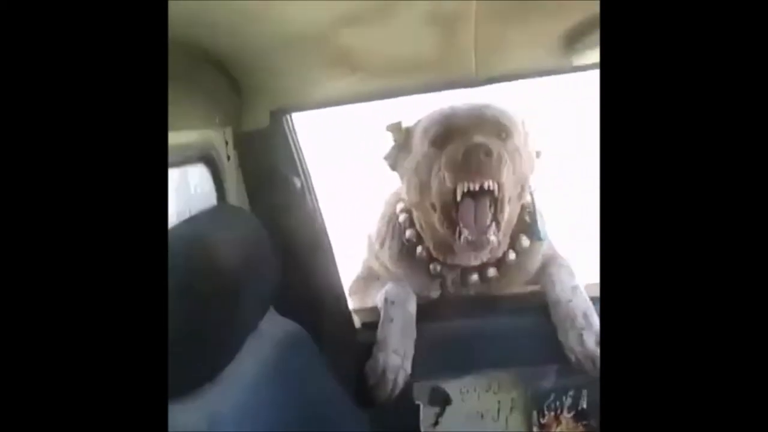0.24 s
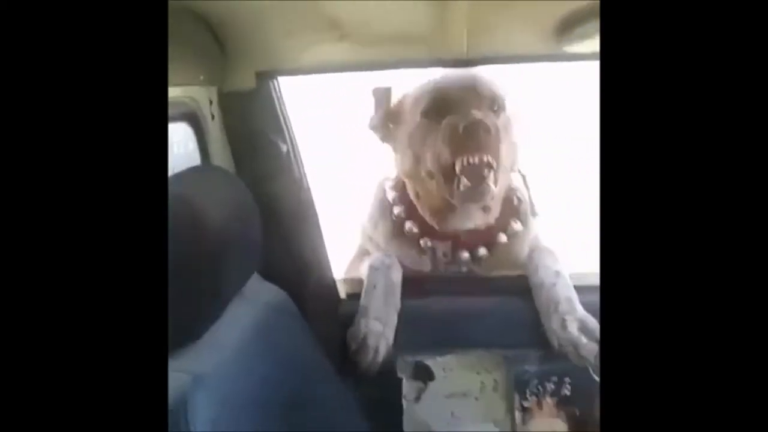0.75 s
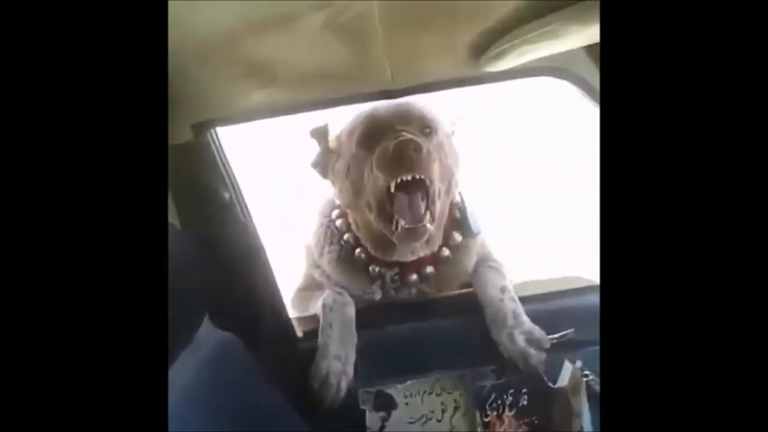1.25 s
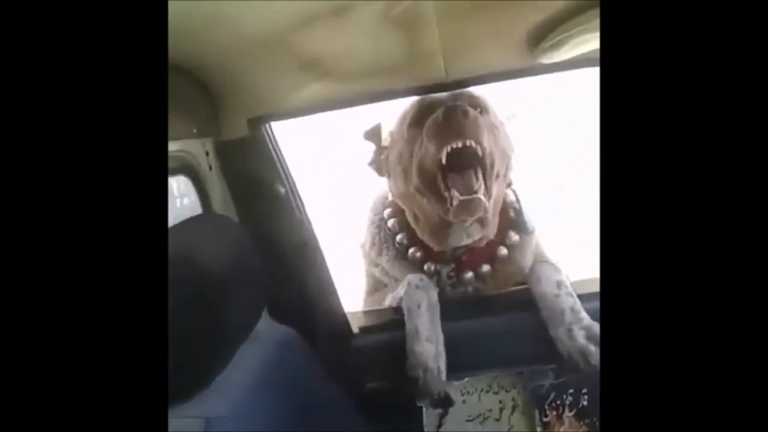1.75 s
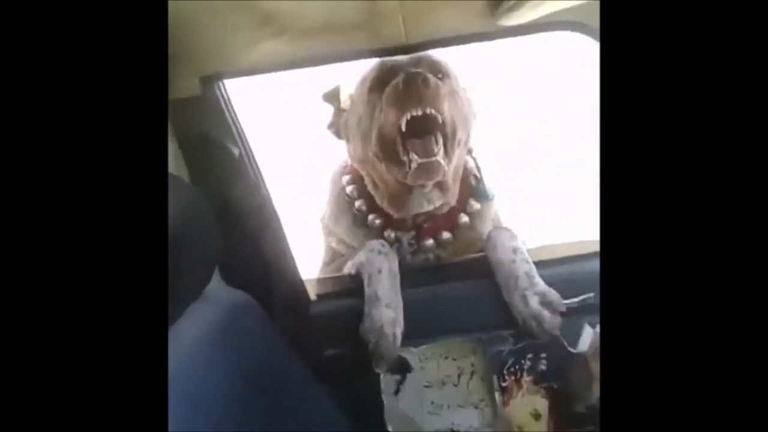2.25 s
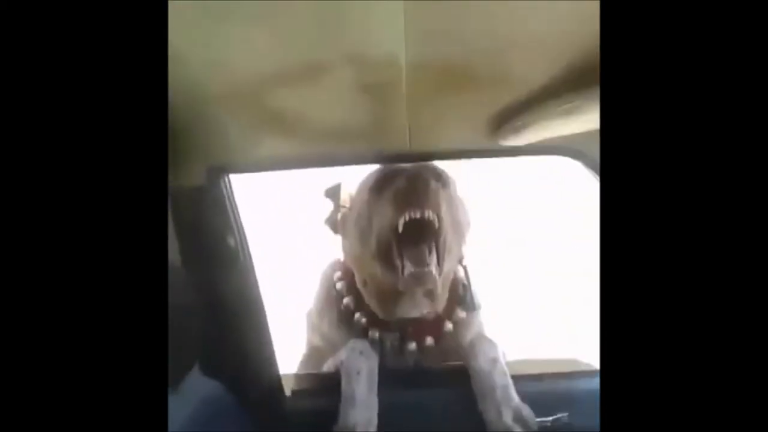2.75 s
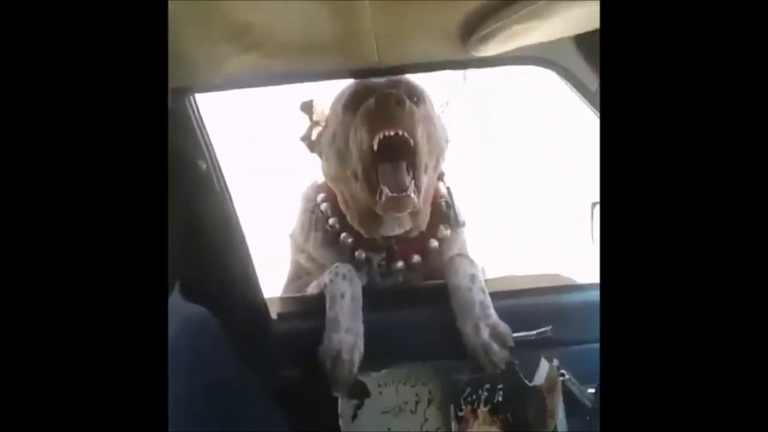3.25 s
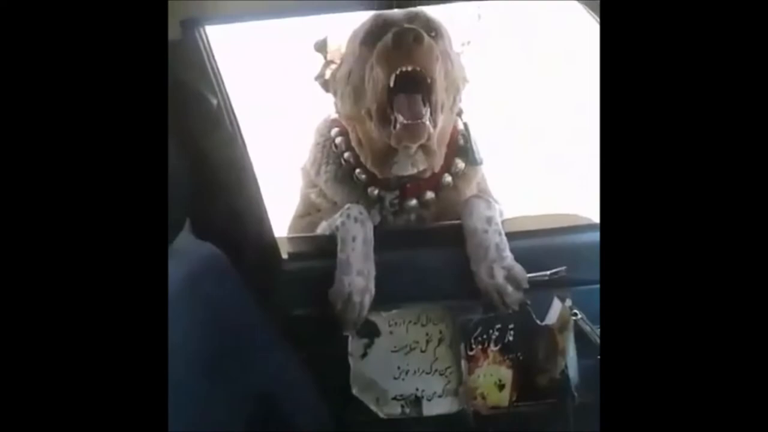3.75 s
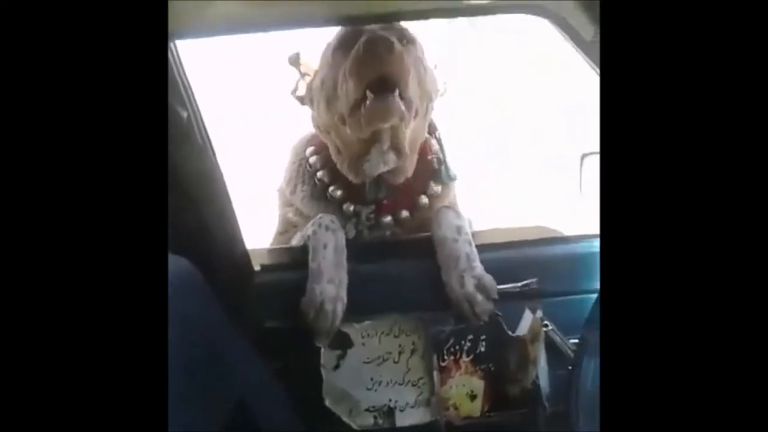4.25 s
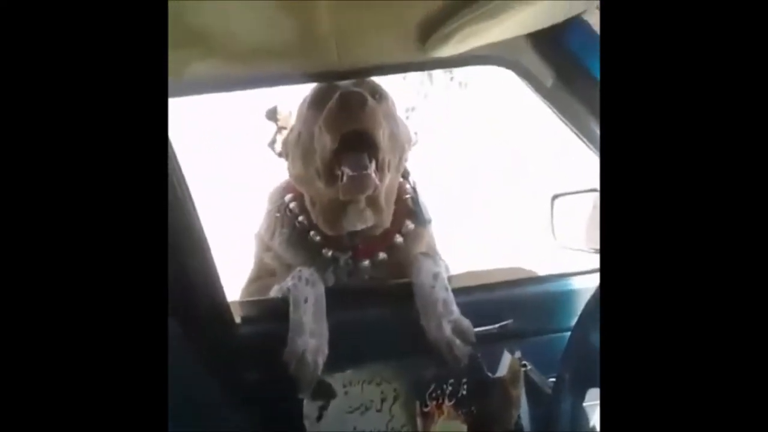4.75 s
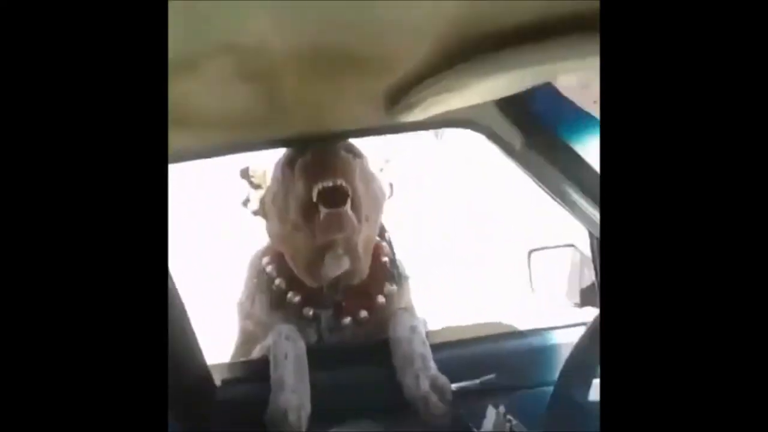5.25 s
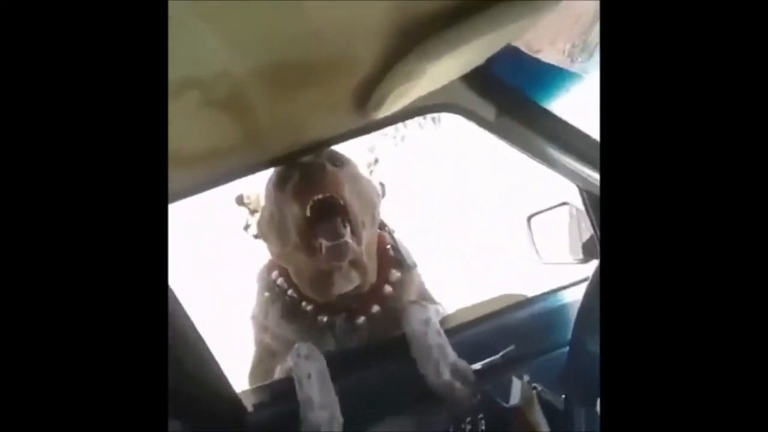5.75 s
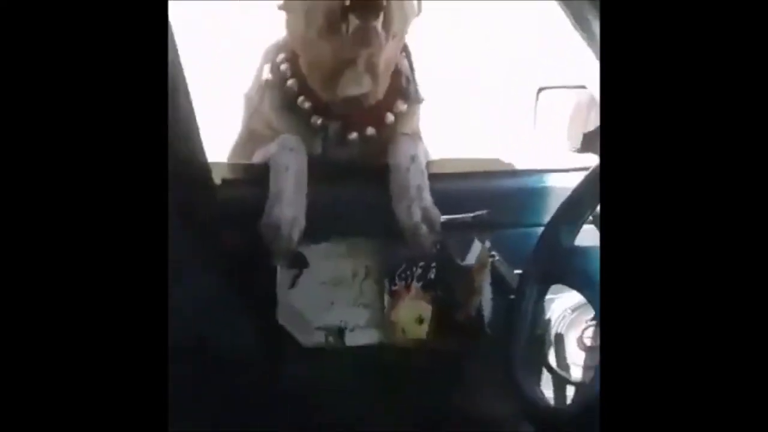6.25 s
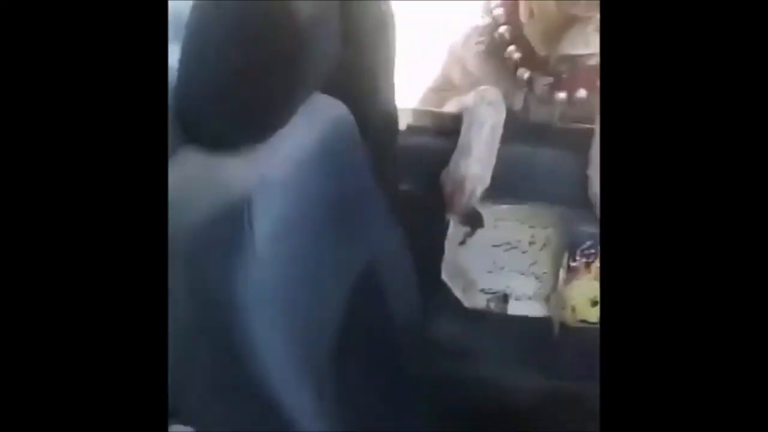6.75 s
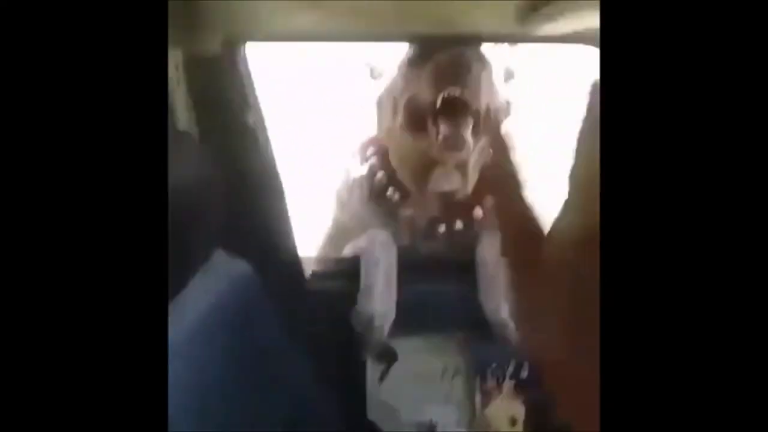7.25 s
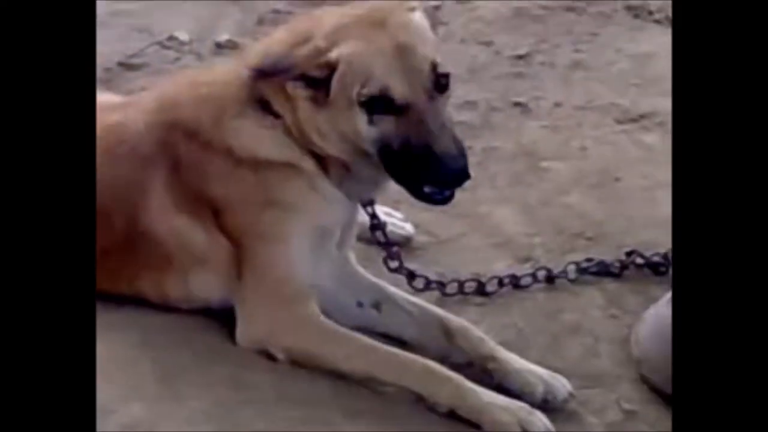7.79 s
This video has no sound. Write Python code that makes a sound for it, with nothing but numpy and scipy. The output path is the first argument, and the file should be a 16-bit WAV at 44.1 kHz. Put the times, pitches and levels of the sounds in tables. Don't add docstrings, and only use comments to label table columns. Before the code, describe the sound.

Close, throaty dog barks between raspy snoring inhalations and fluttering growls; a final loud snarl cuts abruptly to a quiet low moan and chain ticks.

```python
import sys
import numpy as np
from scipy import signal
from scipy.fft import rfft, irfft
from scipy.io import wavfile
from scipy.ndimage import uniform_filter1d

SR = 44100
rng = np.random.default_rng(int(sys.argv[2]) if len(sys.argv) > 2 else 0)


def store_pcm(level_fs):
    pcm = np.round(np.clip(level_fs, -1, 1) * 32767).astype(np.int16)
    wavfile.write(sys.argv[1], SR, np.atleast_2d(pcm).T)


def linear_from_db(decibels):
    return 10 ** (np.asarray(decibels, float) / 20)


N = 353682

# start_s, end_s, level_db, hiss_db (relative), hiss_sag_db_per_s
SNORES = [
    (-.1, 0.602, -33.5, 6.5, 12.5),
    (0.962, 1.5, -36.5, 7.5, 23.5),
    (3.18, 4.043, -35.5, 1, 5.5),
    (4.406, 5.028, -33.5, 1, 17.5),
    (5.435, 6.04, -33, -0.5, 2.5),
]
# time_s, louder_db
HARD_FLAPS = [(0.048, 0.5), (0.224, 5), (0.273, 2.5), (0.499, -3.5), (1.097, 1.5), (1.15, 5.5),
              (1.252, 5.5), (1.413, 1.5), (3.322, 2), (3.526, 2), (3.676, 8.5), (3.775, 4.5), (3.874, 10.5),
              (4, 14), (4.533, -2.5), (4.587, 2.5), (4.713, 2.5), (4.952, 2), (5.521, -3.5), (5.625, 1.5),
              (5.75, 7.5), (5.827, 3.5), (5.975, 3.5)]
# start_s, length_s, level_db, crest_place (0-1), air_db (relative)
BARKS = [
    (0.588, 0.15, -13, 0.5, 0),
    (1.516, 0.14, -10, 0.7, -4.5),
    (2.853, 0.16, -14.5, 0.74, 1),
    (4.066, 0.14, -10, 0.5, -3),
    (5.026, .155, -14, 0.5, -0.5),
    (6.103, 0.16, -15, 0.7, 2.5),
]
# time_s, effort_db, voicing (0-1), lips_drawn_back (0-1), extra_hiss_db
GROWLS = [
    [(1.68, -36.5, 1, 0.25, -6), (1.78, -37.5, 0.37, 0.06, -0.5), (1.98, -38.5, 0, 0.4, -3),
     (2.1, -43.5, 0.52, 0.2, -4), (2.36, -46, 0.62, 0.3, 1.5), (2.52, -35, 0.9, 0.2, -3),
     (2.65, -37.5, 1, 0.07, -0.5), (2.78, -29, 0.95, 0.56, -4.5), (2.92, -24, 0.84, 0.77, 2.5)],
    [(6.28, -36, 0.9, 0, -6), (6.4, -38.5, 0.7, 0.4, -11), (6.6, -44.5, 0.64, 0.6, -4),
     (6.8, -42.5, 0.33, 0.8, -3.5), (7.0, -36, 0.03, 0.8, -3.5), (7.15, -32.5, 0, 0.76, -3.5),
     (7.3, -26, 0.15, 0.76, -5), (7.5, -24, 0.18, 0.77, -5.5), (7.62, -19.5, 0.34, 0.9, 0)],
]


def in_time(rows):
    s, *columns = np.transpose(rows)
    return [np.interp(np.arange(N) / SR, s, c) for c in columns]


def rms_one(x):
    return x / np.sqrt(np.mean(x ** 2) + 1e-20)


def cut(x, hz, kind, order=2):
    return signal.sosfilt(signal.butter(order, hz, kind, fs=SR, output="sos"), x)


def drift(rate, shape=lambda slow: slow):
    r = np.exp(-32 * np.pi * rate / SR)
    slow = signal.lfilter([1], [1, -2 * r, r * r], rng.standard_normal(N // 16 + 2002))[2000:]
    return np.interp(np.arange(N) / 16, np.arange(len(slow)), shape(rms_one(slow)))


def resonate(x, modes, widen=1.0, patchy_db=0.0):
    out = 0
    for k, (hz, width, db) in enumerate(modes):
        r = np.exp(-np.pi * width * widen / SR)
        poles = [1, -2 * r * np.cos(2 * np.pi * hz / SR), r * r]
        rung = signal.lfilter([1, 0, -1], poles, x) * (1 - r * r) / 2
        swell = drift(6.7, lambda slow: linear_from_db(db + patchy_db * slow))
        out = out + (-1) ** k * swell * rung
    return out


def evened(x, size):
    return x / np.sqrt(uniform_filter1d(x ** 2, size, axis=-1) + 1e-12)


def in_step(turns, marks):
    at = (np.array(marks)[:, 0] * SR).astype(int)
    whole = np.cumsum(np.round(np.diff(turns[at], prepend=0)))
    return turns + np.interp(np.arange(N), at, whole - turns[at])


def fade(t, start, end, attack, release):
    return (np.clip((t - start) / attack, 0, 1) * np.clip((end - t) / release, 0, 1)) ** 2.58


def yard():
    # frequency_hz, level_db (per Hz)
    wind_colour = [(15, -19), (25, -22), (55, -12), (102, -25.5), (189, -27), (234, -38), (1050, -40.5),
                   (3710, -42), (7400, -50.5), (9620, -100), (16300, -120)]
    # time_s, peak_db
    chain_ticks = [
        (7.8138, -52),
        (7.8324, -57),
        (7.855, -44),
    ]
    # frequency_hz, width_hz, level_db
    link_modes = [(2560, 630, 0), (4400, 480, 1), (6430, 1800, -13)]
    # time_s, pitch_hz, level_db
    bird_call = [
        (7.70, 1900, -85),
        (7.73, 2300, -68),
        (7.82, 2350, -67),
        (7.89, 2150, -75),
        (7.92, 2100, -92),
    ]
    colour_hz, colour_db = np.transpose(wind_colour)
    hz = np.maximum(np.arange(N // 2 + 1) * SR / N, 1)
    colour = linear_from_db(np.interp(np.log(hz), np.log(colour_hz), colour_db))
    wind = linear_from_db(-56.5) * rms_one(irfft(rfft(rng.standard_normal(N)) * colour, N))
    clicks = np.zeros(N)
    clicks[[round(s * SR) for s, db in chain_ticks]] = linear_from_db(np.array(chain_ticks)[:, 1] + 14.5)
    scuffs = signal.lfilter([1], [1, -.985], np.abs(clicks)) * rng.standard_normal(N)
    bird_hz, bird_db = in_time(bird_call)
    bird = linear_from_db(bird_db) * np.sin(2 * np.pi * np.cumsum(bird_hz) / SR)
    return cut(wind + resonate(scuffs, link_modes) + bird, 7400, "low", order=10)


def moan():
    # time_s, pitch_hz, level_db
    moan_course = [
        (7.612, 137.6, -33),
        (7.678, 135.3, -29),
        (7.708, 131.3, -32),
        (7.854, 118, -31.5),
        (7.868, 125.7, -87),
        (7.88, 126.4, -49),
    ]
    # multiple (of the pitch), level_db
    partials = [(1, -12), (2, -20.5), (3, -39.5), (6, -42.5)]
    last_s, last_hz, _ = moan_course[-1]
    hz, db = in_time(moan_course + [(last_s + 0.0055, last_hz, -110)])
    phase = 2 * np.pi * np.cumsum(hz) / SR
    return np.sqrt(2) * linear_from_db(db) * sum(linear_from_db(part_db) * np.sin(k * phase) for k, part_db in partials)


def whistle_and_tick():
    # time_s, peak_db, pitch_hz
    whistles = [
        (0.815, 2.5, 3625),
    ]
    # time_s, peak_db
    claw_ticks = [
        (6.8447, -11),
    ]
    s, db, hz = whistles[0]
    t = np.arange(N) / SR - s - .008
    out = linear_from_db(db - 19.5) * np.exp(-(t / 0.017) ** 2) * np.sin(2 * np.pi * hz * t + 0.6 * drift(60))
    tick_s, tick_db = claw_ticks[0]
    at = round(tick_s * SR)
    out[at:at + 40] += linear_from_db(tick_db - 5) * rng.standard_normal(40) * np.hanning(40)
    return out


def smacks():
    # time_s, peak_db
    lip_partings = [
        (3.214, -22),
        (4.421, -39),
        (5.464, -35),
    ]
    clicks = np.zeros(N)
    clicks[[round(s * SR) for s, db in lip_partings]] = linear_from_db(np.array(lip_partings)[:, 1] - 8.5)
    noise = signal.lfilter([1], [1, -.993], clicks) * rng.standard_normal(N)
    return cut(noise, [500, 5000], "band", order=1)


def snore_power(t):
    # level_db, attack_s, release_s, hiss_colour_share
    layers = [
        (-3, 0.12, 0.06, 0.011),
        (-0.17, 0.14, 0.075, 0.27),
        (1.5, 0.11, 0.048, 0.66),
        (1.44, 0.12, 0.058, 1.14),
    ]
    out = np.zeros((4, len(t)))
    for start, end, db, hiss_db, sag in SNORES:
        for k, (own_db, attack, release, share) in enumerate(layers):
            colour_db = share * (hiss_db - sag * np.clip(t - start, 0, end - start))
            out[k] += linear_from_db(2 * (db + own_db + colour_db)) * fade(t, start, end, attack, release)
    flap_s = 0.029
    out[1] *= linear_from_db(2 * sum(db * np.exp(-((t - s) / flap_s) ** 2) for s, db in HARD_FLAPS))
    return out


def bark_power(t):
    # level_db, crest_share (of the bark's crest_place), early_drop_db (under the
    # crest after the attack), late_drop_db (under it at the end), fall_db_per_s
    bark_layers = [
        (-15, 0.64, 4.5, 3, 300.5),
        (3.5, 1.51, 12, 9, 467),
        (-5.5, 0.86, 11.5, 5.5, 254),
        (-9.5, 0.12, 8, 4, 254.5),
    ]
    # start_s, hiss_db, mouth_db (rel), throat_db (rel), sag_db_per_s
    pants = [
        (0.729, -22, -3, -9, 54),
        (3.016, -24.5, -1.5, -6.5, 53.5),
        (4.201, -24.5, 5.5, -3, 105.5),
        (5.204, -24, -1.5, -4.5, 30.5),
    ]
    # level_db, own_sag_db_per_s
    pant_layers = [
        (-0.5, 60),
        (0.5, 63.5),
        (-2.5, -23.5),
        (-0.5, -3),
    ]
    attack_s = 0.019
    early_swell = 0.91
    out = np.zeros((4, len(t)))
    for start, length, db, crest, air_db in BARKS:
        for k, (own_db, place, early_db, late_db, fall) in enumerate(bark_layers):
            crest_s = place * crest * length
            times = [attack_s, (2 * attack_s + crest_s) / 3, crest_s, length, length + 1]
            levels = [-early_db, -early_db * (1 - early_swell), 0, -late_db, -late_db - fall]
            shape_db = np.interp(t - start, np.maximum.accumulate(times), levels)
            level_db = db + own_db + air_db * (k != 1) + shape_db
            out[k] += linear_from_db(2 * level_db) * fade(t, start, np.inf, attack_s, 1)
    for start, db, mouth_db, throat_db, sag in pants:
        end = min(row[0] for row in SNORES if row[0] > start) + 0.011
        passed = np.clip(t - start, 0, end - start)
        for k, (own_db, own_sag) in enumerate(pant_layers):
            rel_db = [throat_db, throat_db, mouth_db, 0][k]
            level_db = db + own_db + rel_db - (sag + own_sag) * passed
            out[k] += linear_from_db(2 * level_db) * fade(t, start, end, attack=0.029, release=0.039)
    return out


def breathing():
    # level_db, voiced_db (more at full voicing), bared_db (more with bared teeth)
    growl_layers = [
        (-11, 5, -0.7),
        (-4, 12.5, -4.8),
        (4.5, -3.5, -2.25),
        (-3.5, 2.5, 4.5),
    ]
    # time_s, flaps_per_s
    palate_rate = [(.3, 35.6), (1.2, 38.2), (3.3, 33), (3.45, 35), (3.58, 40), (4.0, 40.3), (4.45, 33),
                   (4.55, 39), (4.75, 42), (5.02, 43), (5.45, 37), (5.6, 39.6)]
    t = np.arange(0, N + 32, 32) / SR
    s, *columns = np.vstack(GROWLS).T
    effort_db, voicing, lips, hiss_db = (np.interp(t, s, c) for c in columns)
    on = sum(fade(t, rows[0][0] - .04, rows[-1][0] + .04, .04, .04) for rows in GROWLS)
    growl = on * np.array([linear_from_db(2 * (effort_db + db + voiced_db * voicing + bared_db * lips))
                           for db, voiced_db, bared_db in growl_layers])
    growl[3] *= linear_from_db(2 * hiss_db)
    snore, bark = snore_power(t), bark_power(t)
    levels_db = 10 * np.log10(snore + bark + growl + 1e-9)
    inward = snore.sum(0) > (bark + growl).sum(0)
    growl_rate = 79 + .2 * np.clip(effort_db + 34, -15, 5) * on
    per_s = np.where(inward, np.interp(t, *np.transpose(palate_rate)), growl_rate)
    wide = bark[2] / (bark[2] + growl[2] + 1e-12)
    curves = (*levels_db, per_s, inward, np.clip(lips * on, 0, 1), wide)
    return [np.interp(np.arange(N) / SR, t, c) for c in curves]


def palate(per_s):
    # pitch_hz, half_length_s, level_db
    flap_tones = [(214, .0055, 5), (625, .0055, 1)]
    turns = in_step(np.cumsum(per_s * (1 + .015 * drift(20))) / SR, HARD_FLAPS) + .6
    flap = rng.standard_normal((1000, 3))[turns.astype(int)]
    t = (turns % 1 - .5) / per_s
    bursts = 0
    for k, (hz, half, db) in enumerate(flap_tones):
        level = linear_from_db(db + (2 + 2 * k) * flap[:, k]) * np.exp(-(t / half) ** 2)
        phase = 2 * np.pi * hz * (1 + .025 * flap[:, 2]) * t + .5 * flap[:, k]
        bursts = bursts + level * np.sin(phase)
    opening = 2.8 + np.exp(-(t / 0.0098) ** 2)
    return rms_one(bursts), rms_one(opening * rng.standard_normal(N))


def snore_sound(per_s):
    # frequency_hz, width_hz, level_db
    airway_modes = [(204, 43, 14), (626, 23.5, -3.5), (1001, 75, -14), (1454, 41, -12), (2048, 9.1, -16),
                    (2950, 42, -22), (4156, 310, -14), (4670, 41, -3), (4962, 24, 0), (5345, 53, 0),
                    (5920, 490, -4), (6410, 290, 0), (7930, 320, -4.5)]
    bursts, air = palate(per_s)
    snore = rms_one(resonate(air, airway_modes[1:], widen=1.9, patchy_db=2.0) + linear_from_db(-32.5) * air)
    throat_air = rms_one(cut(air, [280, 520], "band"))
    low_ring = rms_one(resonate(cut(air, 800, "low"), airway_modes[:2], widen=3))
    return rms_one(snore + .5 * bursts + .11 * throat_air + .2 * low_ring)


def flutter(per_s):
    # time_s, peak_db
    slaps = [(1.7354, -31), (1.7838, -26), (1.7975, -24), (1.8611, -27), (1.9249, -31.5), (1.9988, -31),
             (2.0252, -35), (2.0616, -31), (2.113, -28.5), (2.1529, -28.5), (2.1913, -29), (2.2233, -35.5),
             (2.2731, -31), (2.3135, -30.5), (2.3689, -45.5), (2.4068, -29.5), (2.4557, -29.5),
             (2.4802, -23.5), (2.5041, -23.5), (2.5535, -26), (2.6184, -31), (2.6448, -24.5), (2.6847, -23),
             (2.7346, -26), (2.7725, -19.5), (2.8109, -13), (2.8578, -22), (6.3164, -26), (6.3578, -24),
             (6.4146, -25.5), (6.4565, -33.5), (6.4999, -25), (6.5443, -25.5), (6.5728, -29.5),
             (6.6292, -33), (6.6865, -37), (6.7394, -32.5), (6.8501, -26.5), (6.8901, -28), (6.93, -24),
             (6.9704, -27.5), (7.0098, -28), (7.0492, -17), (7.0886, -18), (7.1275, -21.5), (7.1674, -19.5),
             (7.2193, -18.5), (7.2592, -15.5), (7.2996, -11.5), (7.341, -6.5), (7.3675, -12.5),
             (7.381, -8.5), (7.4228, -10.5), (7.4363, -14), (7.4498, -13.5), (7.4892, -7), (7.5156, -10),
             (7.5421, -9.5), (7.5665, -17)]
    group_db = [-0.5, -1.5, -3.5]
    turns = in_step(np.cumsum(per_s * (1 + .04 * drift(17))) / SR, slaps)
    at = np.flatnonzero(np.diff(np.floor(turns)) > 0) + 1
    chance = np.clip(rng.standard_normal(1000)[:len(at)], -2, 1.2)
    slap_s, slap_db = np.transpose(slaps)
    marked = np.searchsorted(at, slap_s * SR - 100)
    count = np.arange(len(at))
    group = np.maximum(np.searchsorted(marked, count, "right") - 1, 0)
    place = count - marked[group]
    flap_db = 2 * chance + np.array(group_db)[np.clip(place, 0, 2)]
    effort_db = np.interp(slap_s, *np.vstack(GROWLS).T[:2])
    flap_db[marked] = np.clip(slap_db - effort_db - 11.5, -3, 7)
    clicks = np.zeros(N)
    clicks[at] = linear_from_db(flap_db)
    r = np.exp(-1 / (.006 * SR))
    gate = .75 + rms_one(signal.lfilter([1 - r], [1, -r], clicks))
    puffs = rms_one(gate * rng.standard_normal(N))
    return linear_from_db(5.5) * puffs + rms_one(cut(clicks, 3100, "low", order=5)), puffs


def growl_and_snarl(per_s):
    # frequency_hz, width_hz, level_db
    growl_modes = [(174, 52, 7), (665, 64, 6.5), (1474, 19, -3), (1813, 47, -4), (2122, 33, -4.5),
                   (2513, 64, -9), (2745, 37, -11), (6260, 370, -4), (7100, 40, -13), (4310, 120, -21),
                   (8080, 180, -20.5), (8630, 120, -22.5)]
    snarl_modes = [(200, 93.6, -3.5), (627, 33, 4), (1352, 19, -21), (1589, 25, -15), (1873, 21, -12.5),
                   (2070, 30, -15.5), (2236, 18, -21), (2576, 28, -21.5), (2970, 14, -31.5),
                   (4900, 180, -19), (5900, 92, -23), (5850, 94, -10), (6940, 60, -16.5), (8700, 520, -47)]
    hard, hard_air = flutter(per_s)
    growl = resonate(hard, growl_modes, widen=1.8, patchy_db=1)
    growl = growl + linear_from_db(-18) * cut(hard, [1200, 3000], "band")
    low_part, high_part = cut(growl, 3150, "low", order=14), cut(growl, 4300, "high", order=5)
    growl = rms_one(low_part + 0.006 * growl + linear_from_db(10.5) * high_part)
    snarl = rms_one(resonate(hard, snarl_modes, widen=2.5, patchy_db=1) + linear_from_db(-23) * hard_air)
    return growl, snarl


def bark_and_pant():
    # frequency_hz, width_hz, level_db
    bark_modes = [(209, 7, 16), (590, 30, -16.5), (896, 90, -5.5), (1075, 43, -3), (1240, 34, -7),
                  (1460, 33, -9), (1607, 36, -13), (2187, 30, -20.5), (4100, 660, -34.5), (4556, 95, -9),
                  (6850, 1100, -20.5), (7550, 60, -8), (9260, 24, -47.5)]
    rasp_modes = [(1814, 40, -14), (1950, 44, -19), (430, 210, -12), (5870, 620, -18)]
    pant_modes = [(1080, 28, -28), (1482, 24, -3), (2106, 17, -10), (4600, 170, -6.5), (3670, 200, -9.5),
                  (4260, 99, -13), (4870, 17, -11), (5170, 474, -0.5), (6440, 340, -10.5), (7700, 100, -40)]
    blast = rng.standard_normal(N) * linear_from_db(drift(55))
    bark = resonate(blast, bark_modes + rasp_modes, widen=1.19, patchy_db=3.5)
    bark = rms_one(bark + linear_from_db(-37.5) * cut(blast, [850, 2400], "band") + linear_from_db(-24.5) * blast)
    pant = resonate(blast, bark_modes[:2] + pant_modes, widen=4.46, patchy_db=7.0)
    return bark, rms_one(pant + linear_from_db(-15.0) * blast)


def mouth_shapes(throat_db, per_s, inward, lips, wide):
    barking = np.clip((throat_db + 29.5) / 25, 0, 1)
    voiced = (1 - inward) * (1 - lips) * np.clip((throat_db + 40) / 15, 0, 1)
    snore = snore_sound(per_s)
    growl, snarl = growl_and_snarl(per_s)
    bark, pant = bark_and_pant()
    closed = (1 - lips) * growl + lips * snarl
    jaws = barking * bark + (1 - barking) * pant
    return inward * snore + (1 - inward) * ((1 - wide) * closed + wide * jaws), voiced


def yelp():
    # highest_s, pitch_hz, fall_hz (by the end)
    yelps = [
        (0.657, 628.2, 64),
        (1.621, 636, 25),
        (2.99, 641, 120),
        (4.161, 646, 45),
        (5.128, 638, 40.5),
        (6.222, 635, 15),
    ]
    points = []
    for (start, length, *_), (top, top_hz, fall_hz) in zip(BARKS, yelps):
        end = start + length
        points += [(start + .02, 613), (top, top_hz), (end + .02, top_hz - fall_hz), (end + .2, 616)]
    hz, = in_time(points)
    phase = 2 * np.pi * np.cumsum(hz * (1 + .028 * drift(40))) / SR
    throb = np.sin(2 * np.pi * np.cumsum(61 * (1 + .2 * drift(12))) / SR)
    bursts = .9 + .3 * drift(50) + .42 * throb
    tone = np.exp(1j * phase)
    return bursts * tone.imag, tone


def throbbing(voice, tone, rasp, throat_db):
    # centre_s, peak_db, half_length_s
    throat_throbs = [(.609, -21, .005), (.624, -22, .006), (.637, -13, .006), (.649, -11, .008),
                     (.675, -9, .013), (.698, -7, .009), (.729, -7, .014), (.755, -20, .012),
                     (1.545, -18, .009), (1.578, -14, .008), (1.596, -10, .011), (1.622, -8, .008),
                     (1.638, -7, .01), (1.661, -11, .01), (1.688, -16, .009), (1.717, -28, .01),
                     (2.81, -13, .014), (2.841, -12, .008), (2.858, -12, .009), (2.878, -17, .006),
                     (2.9, -16, .007), (2.919, -13, .01), (2.941, -10, .007), (2.956, -14, .008),
                     (2.976, -14, .008), (2.992, -7, .01), (3.011, -8, .01), (3.029, -16, .006),
                     (3.045, -27, .01), (3.066, -28, .01), (4.084, -15, .006), (4.104, -19, .007),
                     (4.127, -9, .014), (4.154, -7, .009), (4.171, -7, .006), (4.183, -10, .006),
                     (4.198, -8, .008), (4.218, -12, .008), (4.232, -19, .006), (4.247, -30, .008),
                     (5.042, -22, .008), (5.073, -14, .008), (5.086, -13, .007), (5.109, -10, .01),
                     (5.131, -8, .008), (5.157, -7, .009), (5.179, -18, .008), (5.193, -26, .008),
                     (6.119, -27, .006), (6.136, -19, .008), (6.162, -13, .009), (6.184, -11, .011),
                     (6.205, -10, .01), (6.221, -10, .01), (6.24, -9, .011), (6.258, -14, .01),
                     (6.28, -21, .01), (6.3, -24, .012), (6.392, -21, .016), (6.423, -25, .012),
                     (2.46, -31, .009), (2.493, -26, .012), (2.531, -21, .011), (2.568, -19, .011),
                    (2.608, -22, .012), (2.632, -25, .006), (2.657, -22, .011), (2.696, -18, .011),
                    (2.723, -18, .008), (2.741, -14, .007), (2.771, -16, .008), (2.791, -15, .007),
                    (6.322, -25, .01), (6.345, -26, .009), (6.366, -25, .009), (6.464, -26, .012),
                    (6.5, -27, .013), (6.539, -31, .009), (6.578, -29, .011), (6.607, -36, .008)]
    t = np.arange(0, N + 16, 16) / SR
    rows = sorted(throat_throbs)
    soft = np.array(rows)[:, 1] < -19
    slip_rad = 2.0 * np.where(soft, .2, 1)
    slips = np.exp(1j * np.cumsum(slip_rad * rng.standard_normal(len(rows))))
    stretches = np.where(soft, 1.4, 1)
    swing = sum(slip * linear_from_db(db) * np.exp(-((t - s) / half / stretch) ** 2)
                for (s, db, half), slip, stretch in zip(rows, slips, stretches))
    reach_s = .022
    near = np.clip(1.5 * sum(np.exp(-((t - s) / reach_s) ** 4) for s, db, half in rows), 0, 1)
    husk = uniform_filter1d(np.abs(swing), size=60)
    swing, husk, near = (np.interp(np.arange(N) / SR, t, c) for c in (swing, husk, near))
    return (1 - near) * voice + near / linear_from_db(throat_db) * (np.imag(swing * tone) + husk * rasp)


def mottled(x, patchy_db):
    _, _, frames = signal.stft(x, nperseg=768)
    field = rms_one(uniform_filter1d(rng.standard_normal(frames.shape), size=12, axis=1))
    return signal.istft(frames * linear_from_db(patchy_db * np.minimum(field, 1.3)), nperseg=768)[1][:N]


def thinned(x):
    hz, _, frames = signal.stft(x, SR, nperseg=768)
    power = uniform_filter1d(np.abs(frames) ** 2, size=4, axis=-1)
    around = uniform_filter1d(power, size=70, axis=-2)
    weak = uniform_filter1d(power, size=3, axis=-2) < linear_from_db(2 * -15.5) * around
    gain = np.where(weak & (hz[:, None] > 2300), .15, 1)
    return signal.istft(frames * gain, nperseg=768)[1][..., :N]


def window_dog():
    band_edges_hz = [90, 400, 850, 3200]
    # frequency_hz, width_hz, level_db
    throat_modes = [(624, 130, 0)]
    raised_modes = [(624, 130, -4), (750, 90, 1)]
    upper_notch_hz = [3000, 3460]
    low_hz, throat_hz, mouth_hz, top_hz = band_edges_hz
    chest_db, throat_db, mouth_db, hiss_db, per_s, inward, lips, wide = breathing()
    chest_db, mouth_db, hiss_db = chest_db - throat_db, mouth_db - throat_db, hiss_db - throat_db
    mix, voiced = mouth_shapes(throat_db, per_s, inward, lips, wide)

    core = cut(mix, [throat_hz, mouth_hz], "band")
    rung = (1 - lips) * resonate(core, throat_modes) + lips * resonate(core, raised_modes)
    core = evened(rung + 0.74 * core, size=4000)
    broken, tone = yelp()
    rasp = .1 * evened(cut(mix, [500, 780], "band"), size=4000)
    rasp = rasp + .15 * evened(cut(mix, [380, 550], "band"), size=4000)
    voice = evened((1 - 0.75 * voiced) * core + 0.63 * voiced * broken, size=4000)
    voice = throbbing(voice, tone, rasp, throat_db)

    chest = cut(cut(mix, [low_hz, throat_hz], "band"), 99, "high")
    voice += linear_from_db(chest_db) * evened(cut(chest, 330, "low", order=3) + 0.28 * chest, size=4000)
    middle = cut(cut(mix, [mouth_hz, top_hz], "band", order=3), 890, "high", order=8)
    clear = .45 + .45 * (1 - inward) * (1 - wide)
    middle = clear * middle + (1 - clear) * 1.2 * mottled(middle, patchy_db=7.0)
    voice += linear_from_db(mouth_db) * evened(middle, size=4000)

    treble = cut(mix, top_hz, "high", order=4)
    treble = .35 * clear * treble + (1 - .35 * clear) * .6 * mottled(treble, patchy_db=5.5)
    hiss = linear_from_db(hiss_db) * evened(treble, size=3000)
    late = mottled(np.roll(hiss / linear_from_db(hiss_db), 700), patchy_db=16)
    side = linear_from_db(-11) * linear_from_db(hiss_db) * rms_one(cut(late, 4100, "high", order=12))

    total_db = throat_db + np.maximum(hiss_db, 0)
    rumble_db = np.minimum(total_db, -36) - 0.6 * np.maximum(total_db + 23, 0) - 26.0
    rumble = linear_from_db(rumble_db) * rms_one(cut(rng.standard_normal(N), [45, 110], "band"))
    rumble = rumble * np.clip((total_db + 48) / 12, 0, 1)

    voice -= .75 * cut(voice, [750, 870], "band", order=1)
    mono = linear_from_db(throat_db) * (voice + hiss)
    mono -= .6 * wide * cut(mono, upper_notch_hz, "band", order=1)
    return thinned(cut(mono, 62, "high", order=4)) + linear_from_db(throat_db) * side * [[1], [-1]] + rumble


def scene():
    gate_floor = linear_from_db(-63) * cut(rng.standard_normal(N), 3000, "low")
    car = window_dog() + whistle_and_tick() + smacks() + gate_floor
    car = 0.83 * np.tanh(car / 0.79)
    limit = signal.ellip(14, .5, 95, 9720, fs=SR, output="sos")
    car = signal.sosfilt(limit, car[:, ::-1])[:, ::-1]
    change_s = 7.606
    return np.where(np.arange(N) < change_s * SR, car, moan() + yard())


def low_pass(x):
    return signal.sosfilt(signal.butter(12, 16000, fs=SR, output="sos"), x)


def record(dry):
    return low_pass(dry)


dry = scene()
out = record(dry)
store_pcm(out)
```